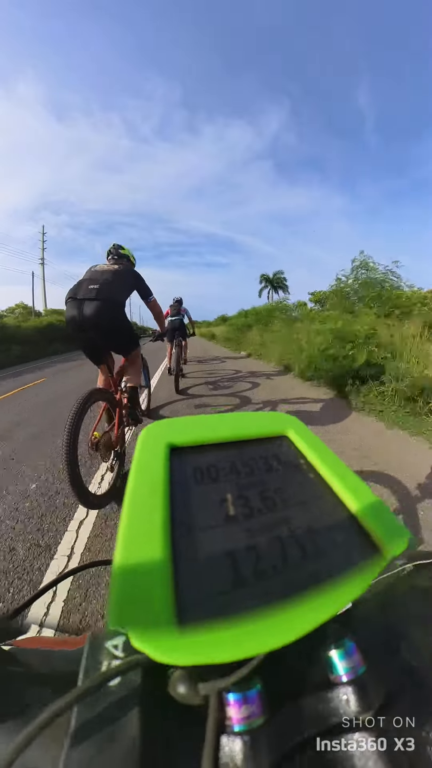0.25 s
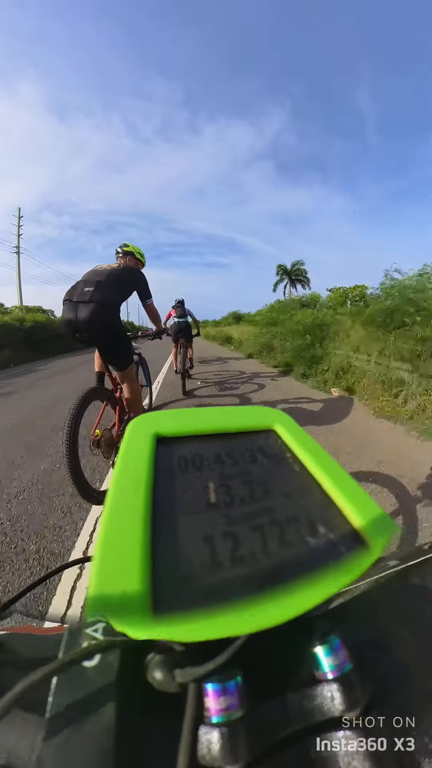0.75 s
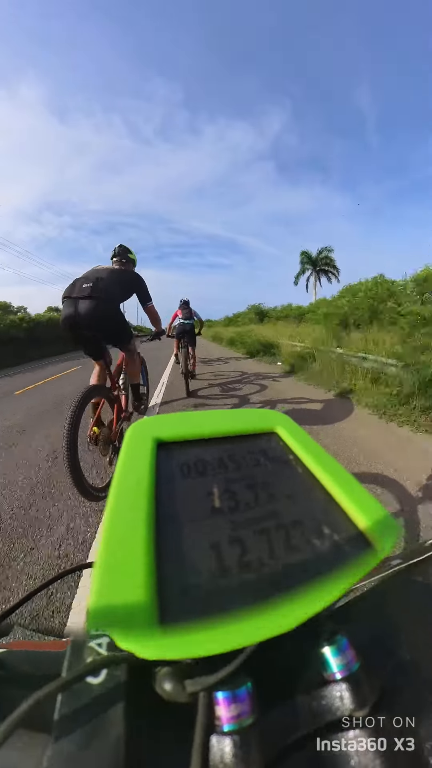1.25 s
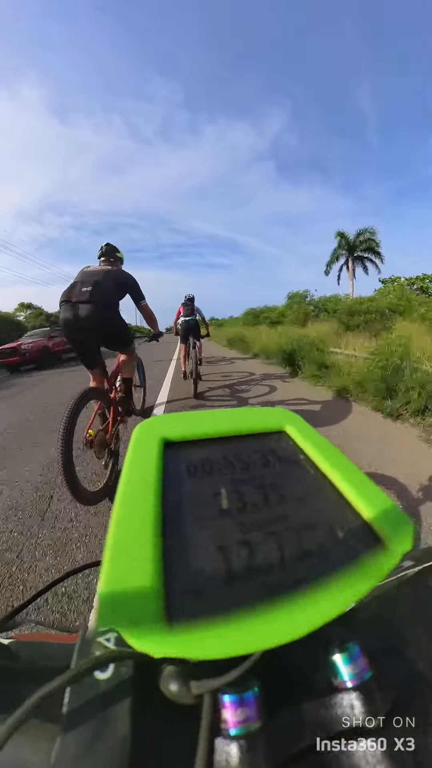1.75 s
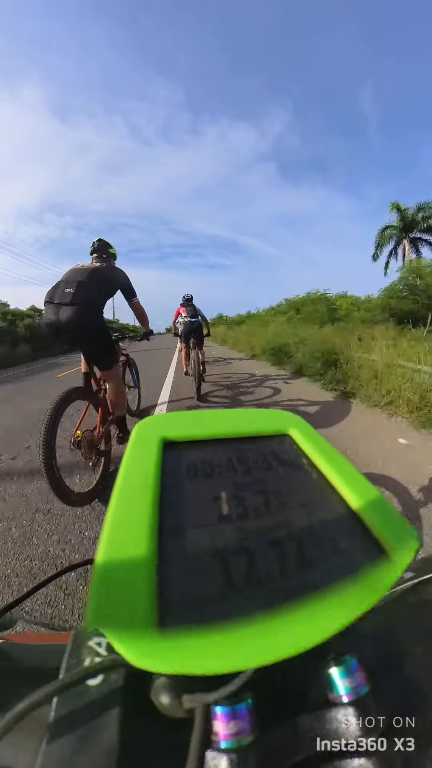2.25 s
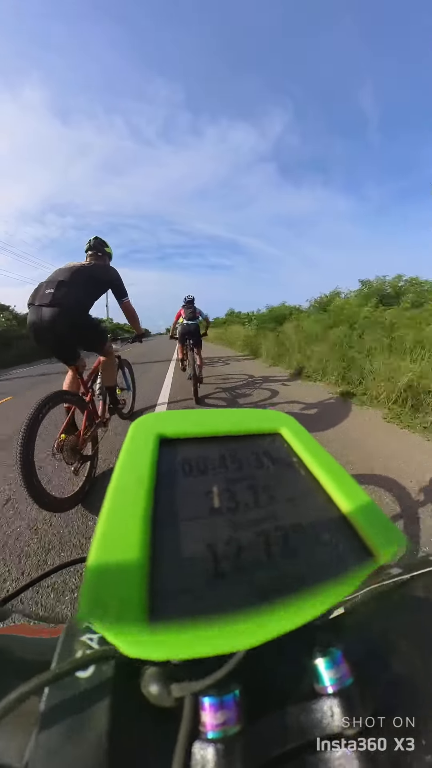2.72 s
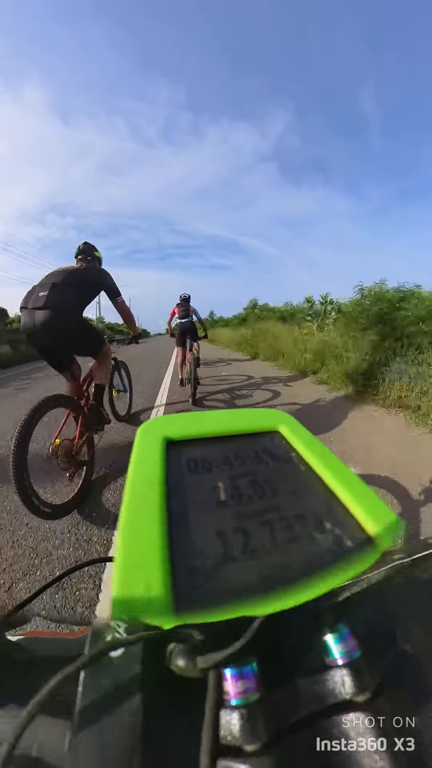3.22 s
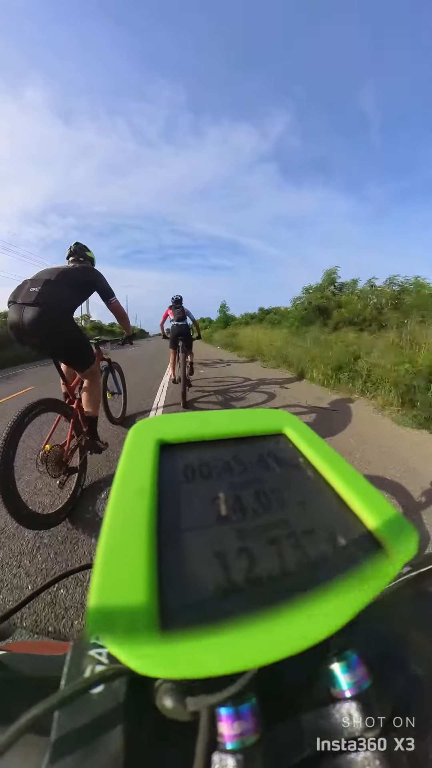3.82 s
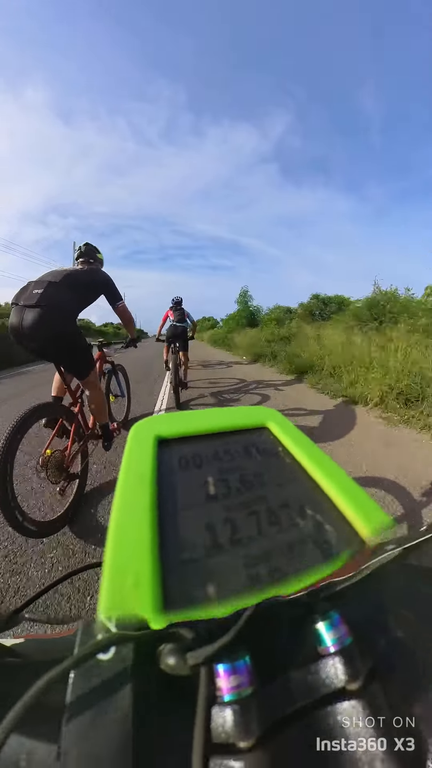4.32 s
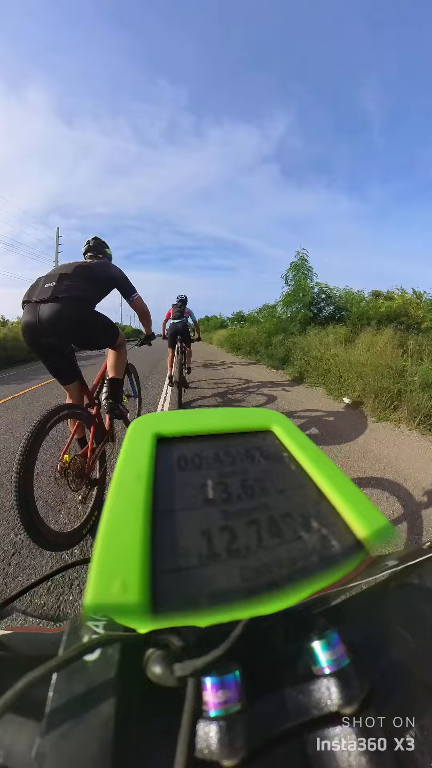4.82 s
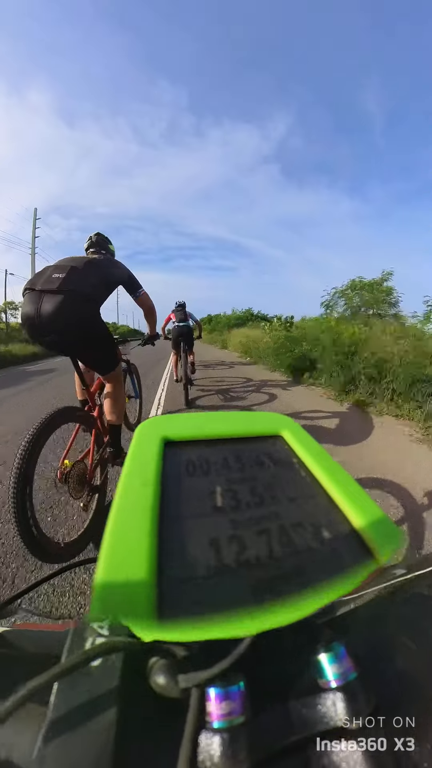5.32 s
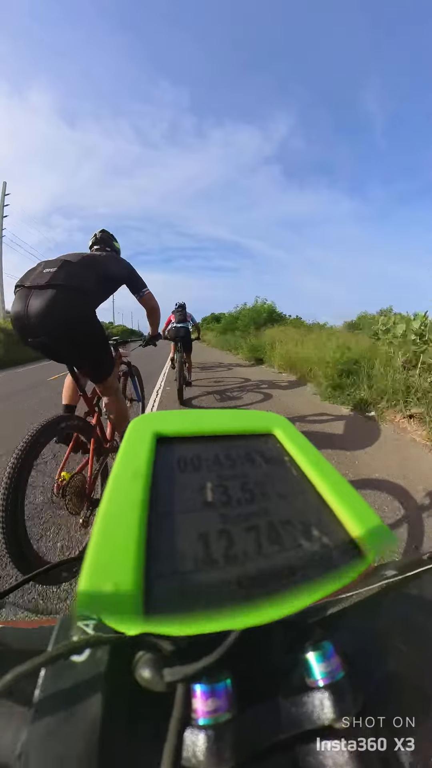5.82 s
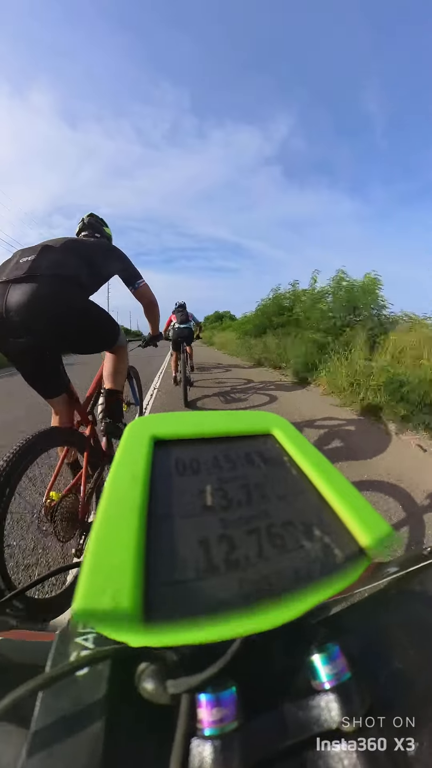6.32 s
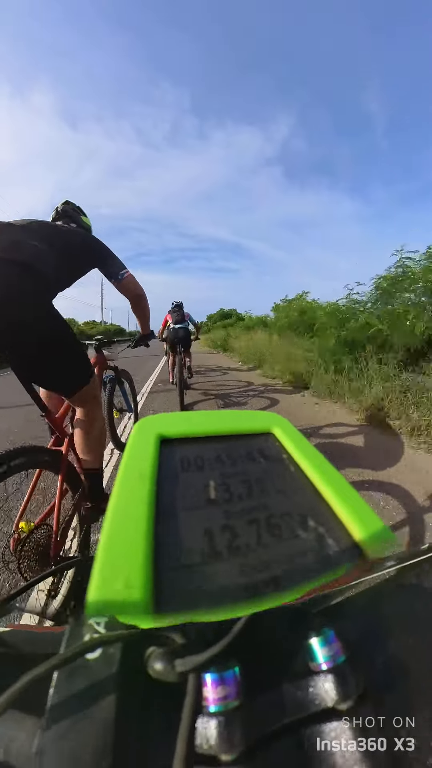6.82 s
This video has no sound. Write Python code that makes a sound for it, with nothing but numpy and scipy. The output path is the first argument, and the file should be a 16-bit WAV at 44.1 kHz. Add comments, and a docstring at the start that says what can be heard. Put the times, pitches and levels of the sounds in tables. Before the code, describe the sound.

Low, lumpy wind rumble with popping gusts, broken by dry plastic clicks and dull thumps from a loose handlebar mount on a road ride.

```python
"""Mountain bike ride with a loose camera mount

A camera on a loose handlebar mount rides along a country road. Wind noise is shaped by gusts, eddies and lulls.
Tyres drone as a wandering sine and hiss as noise; the chain is ticking noise that makes steel ring.
At knocks the mount clicks and thumps; loose fittings chatter. Both are short ringing tones set off by clicks.
Farther tyres rush as filtered noise, and a small bird whistles in gliding sines."""
import sys
import numpy as np
from scipy import signal
from scipy.fft import rfft, irfft, next_fast_len
from scipy.io import wavfile
from scipy.ndimage import uniform_filter1d, minimum_filter1d, map_coordinates

SR = 44100
rng = np.random.default_rng(int(sys.argv[2]) if len(sys.argv) > 2 else 0)


def generate_wav(signal):
    """Clip the signal to [-1, 1] and save it as 16-bit WAV at the path in sys.argv[1]."""
    frames = np.transpose(np.atleast_2d(signal))
    scaled = np.clip(frames, -1, 1) * 32767
    pcm = np.round(scaled).astype(np.int16)
    wavfile.write(sys.argv[1], SR, pcm)


N = 311301
TIME = np.arange(N) / SR

# Levels in the tables are starting points: the functions add trims and chance to many of them.
# Half widths are the spread of a bell curve. Only the shape of a colour counts, not its overall level.

# airflow over the microphone, as the level of its roar: t/s, level/dB
AIRFLOW = [(0, -38), (0.5, -33), (0.93, -41.5), (1.5, -30.5), (1.95, -35), (2.35, -28.5), (2.55, -31),
           (3.2, -31.5), (3.5, -35.5), (3.85, -33.5), (4.3, -36), (4.85, -31.5), (5.25, -33.5), (5.75, -38),
           (6.1, -35.5), (6.48, -25), (6.64, -34), (7.06, -29.5)]
# the wind drops away for a moment (a negative depth is a brief rise):
# middle t/s, depth in the buffeting/dB, depth in the roar/dB, half width/s
LULLS = [(0.241, -3.5, 11, 0.0089), (0.293, 1.5, 12, 0.024), (0.444, 5, 26, 0.016), (0.644, 16, 6, 0.0051),
         (0.718, 0, 4, .008), (0.774, 7.5, 0.5, 0.016), (0.89, 5, -3.5, 0.017), (1.01, -1.5, 1, 0.009),
         (1.21, -2.5, 9, 0.016), (1.377, 3, 10, .012), (1.49, -4.5, 7, 0.0078), (1.652, 2, 6, .007),
         (1.726, 4, 3.5, 0.024), (1.772, -2, 5, .009), (2.406, 5, 2, 0.022), (2.53, -0.5, 7, 0.016),
         (2.926, 3, 12, 0.0098), (2.97, 5, -3, 0.023), (3.386, 8, 2, 0.0075), (3.496, 5.5, 1.5, 0.037),
         (3.6, 4, 6, .012), (3.905, -3, 3, 0.0075), (3.95, 4, -2, .012), (4.175, 2.5, -1.5, 0.017),
         (4.243, 5, -2, 0.024), (4.287, -3, 3, 0.0072), (4.514, 0, 3, 0.01), (4.67, 4, 4, 0.008),
         (4.752, 6, 10, 0.012), (4.921, 5, 0, 0.0071), (5.033, 11, 6, 0.0092), (5.064, -3, 6, 0.0084),
         (5.67, -2.5, 13, 0.0055), (5.734, 8.5, -2.5, 0.024), (5.815, -5.5, 6, 0.011), (5.866, 3, -6, .011),
         (5.93, 1, -1, .01), (6.023, -2, 2, 0.034), (6.06, -1, -1, 0.0069), (6.331, 3, 5.5, 0.03),
         (6.428, 6, 1.5, .01), (6.605, 8, -5, 0.0086), (6.666, 0, 4, 0.006), (6.777, 2.5, 1, 0.012)]
# heavy eddies boom on the microphone: middle t/s, level/dB, half width/s
EDDIES = [(0.434, -19, 0.011), (0.522, -16, .01), (1.145, -16, 0.0079), (1.265, -21.5, 0.0089),
          (1.544, -16.5, 0.011), (2.258, -24, .014), (2.349, -19, 0.015), (2.499, -18, 0.0088),
          (2.814, -27, 0.0088), (2.914, -19.5, .011), (3.056, -17, 0.0099), (3.135, -26, 0.0079),
          (3.213, -14.5, 0.0062), (3.567, -20, 0.0074), (3.655, -15, 0.0061), (3.805, -25, 0.0087),
          (4.061, -26, 0.011), (4.45, -20.5, 0.017), (4.589, -24, 0.0072), (4.724, -23, 0.0061),
          (4.85, -17.5, 0.015), (5.14, -21.5, .01), (5.358, -22, 0.01), (5.443, -19.5, 0.008),
          (5.69, -19, 0.0064), (5.83, -18.5, 0.0088), (5.97, -16, .008), (6.18, -14.5, .01),
          (6.239, -15, 0.0096), (6.403, -19, .01), (6.675, -22, 0.0098), (6.986, -26, 0.011)]
# gusts hit the microphone; the broad row at 1.288 s is instead a soft swell of hiss: middle t/s, level/dB, half
# width/s, hiss of the tearing air level/dB
GUSTS = [(0.24, -28.5, 0.019, -53), (0.271, -27, 0.006, -62), (0.36, -20.5, 0.0085, -44),
         (0.466, -22.5, 0.0046, -61), (0.534, -23, 0.0084, -53), (0.74, -24.5, 0.0079, -68),
         (0.83, -29, 0.0061, -58), (1.062, -23.5, 0.009, -48), (1.122, -24, 0.021, -60),
         (1.288, -36.5, .05, -53), (1.44, -27.5, 0.015, -61), (1.52, -34, .008, -62),
         (1.626, -20.5, 0.0074, -56), (1.808, -25, 0.0083, -62), (1.862, -23, 0.0062, -62),
         (2.198, -23, 0.012, -57), (2.37, -20, 0.0032, -59), (2.465, -22, 0.0067, -51),
         (2.659, -26.5, 0.017, -51), (2.728, -21.5, 0.0035, -58), (2.875, -22.5, 0.012, -63),
         (2.978, -27, 0.0069, -60), (3.08, -25, 0.012, -48), (3.264, -23, 0.0043, -60),
         (3.282, -28, 0.0047, -47.5), (3.699, -24, 0.014, -54), (4.002, -25, 0.003, -61),
         (4.028, -23.5, 0.041, -51), (4.096, -30, 0.0075, -53), (4.388, -23, .006, -59),
         (4.411, -22, 0.01, -52), (4.551, -18, 0.012, -57), (4.71, -22, 0.013, -62),
         (4.799, -22.5, 0.014, -53), (4.896, -21.5, 0.012, -45.5), (4.99, -18.5, 0.0094, -69),
         (5.151, -19.5, 0.012, -52), (5.521, -21.5, 0.0083, -51), (5.547, -20.5, 0.021, -50),
         (5.597, -23.5, 0.016, -54), (5.642, -22, 0.0076, -62), (5.688, -18.5, 0.0046, -58),
         (5.893, -19, 0.0068, -44), (5.921, -19.5, 0.0084, -58), (6.285, -21, 0.0075, -64),
         (6.414, -37, 0.012, -48), (6.47, -25, .02, -54), (6.535, -19.5, 0.0032, -40),
         (6.579, -22, .006, -47), (6.725, -21, 0.02, -53), (6.934, -24.5, 0.006, -45.5),
         (6.971, -23.5, 0.0082, -51)]
# the front of a sharp gust slaps the microphone port: t/s, level/dB
SLAPS = [(0.242, -20), (0.347, -22), (0.555, -28), (0.737, -20), (1.061, -13), (1.110, -24), (1.625, -2),
         (1.795, -22), (2.403, -16.5), (2.465, -16), (2.726, -13), (3.577, -21), (4.001, -14), (4.380, -21),
         (4.533, -18), (4.696, -22), (4.788, -21), (4.888, -13), (4.982, -18), (5.517, -9), (5.682, -15),
         (5.892, -12.5), (6.283, -12.5), (6.534, -5), (7.034, -19)]
# air in the microphone port: f/Hz, level/dB, time to fall by 60 dB/s
PORT_MODES = [(486, 2, 0.013), (840, -2, 0.0029), (1310, -15, 0.0034)]
# colours of low buffeting, steady roar, brighter gusts and tearing air: f/Hz, level/dB per Hz
BUFFET_COLOUR = [(60, -5), (90, -8), (125, 0.5), (160, -1), (195, -2), (230, -1), (275, -8.5), (380, -17),
                 (600, -24.5), (1200, -43.5)]
ROAR_COLOUR = [(120, -2), (220, -2.5), (320, 4), (500, 0), (800, -8), (1100, -13), (1430, -22), (1530, -32),
               (2000, -31.5), (3000, -46.5), (5000, -51)]
BLAST_COLOUR = [(120, 0.5), (220, 2.5), (320, 6), (500, 1), (800, -5.5), (1080, -11.5), (1430, -18.5),
                (1550, -27), (2000, -31.5), (3000, -40.5), (5000, -52.5)]
TEAR_COLOUR = [(900, 2), (1900, 5.5), (2900, -8.5), (5000, -18)]

# tread blocks meet the road: t/s, f/Hz, drone level/dB
TREAD = [(0, 137.6, -28), (1.7, 122.6, -27.5), (2.0, 125, -21), (2.3, 133.2, -20.5), (2.42, 136.9, -31),
         (2.8, 148, -22), (3.4, 139, -31), (3.7, 134, -21), (4.1, 132.6, -25.5), (4.9, 126.3, -30.5),
         (5.4, 134, -21.5), (5.7, 135.7, -28), (6.3, 133.1, -47), (7.06, 131.1, -18)]
# roughness of the road, as handlebar shake: t/s, level/dB
SHAKE = [(0, -50), (0.35, -18), (0.95, -22), (1.35, -22), (1.8, -27), (2.1, -22.5), (2.55, -30), (2.8, -20),
         (3.05, -39), (3.3, -25), (4.7, -27), (5.08, -34), (5.35, -25), (6.2, -44), (6.55, -31),
         (7.06, -43)]
# colour of the handlebar shake: f/Hz, level/dB per Hz
SHAKE_COLOUR = [(15, -30), (28, -16), (40, 13), (53, 11), (75, -10), (110, 15), (200, -72)]

# pull on the chain, as its sizzle: t/s, level/dB
SIZZLE = [(0, -58), (0.48, -55.5), (0.66, -59.5), (1.1, -55), (2.1, -54.5), (2.8, -53), (3.6, -54.5),
          (4.45, -51.5), (5.05, -56.5), (5.33, -48), (5.6, -54.5), (6.05, -51.5), (6.25, -56), (7.06, -54)]
# the hardest chain slaps: t/s, level/dB
CHAIN_SLAPS = [(1.063, -37), (1.1932, -44), (1.3867, -37), (1.6232, -35.5), (1.731, -42), (2.0303, -43),
               (2.1161, -36), (2.3067, -40), (2.375, -42), (2.4184, -42), (2.7841, -38), (3.0001, -41),
               (3.1552, -40), (3.2201, -39.5), (3.5937, -36.5), (3.8566, -38), (3.9015, -34), (3.9426, -39),
               (4.0756, -38), (4.1904, -48), (4.3355, -36.5), (4.4722, -37), (4.5361, -40), (4.6049, -37),
               (4.6488, -35), (4.7551, -42), (4.8224, -40), (4.9312, -38), (5.0648, -42), (5.0868, -35.5),
               (5.1951, -38), (5.2839, -38), (5.3063, -43), (5.3308, -38), (5.3504, -44), (5.3966, -30.5),
               (5.5464, -39), (5.5912, -40), (5.659, -43), (5.7049, -38), (5.8152, -43), (5.8566, -39),
               (5.88, -41), (6.0122, -42), (6.1015, -34), (6.3679, -38), (6.5238, -37), (6.7012, -34),
               (6.7905, -36), (6.8139, -42), (6.925, -34)]
# colour of the chain's touch: f/Hz, level/dB per Hz
CHAIN_COLOUR = [(3000, -33), (7800, -11.5), (8500, -3.5), (8900, 0.5), (9300, -0.5), (9800, 4.5),
                (10250, 7), (10650, -6.5), (11000, 1), (11400, -1), (12600, -9), (13700, -19), (16000, -25)]
# steel rings of the drivetrain: f/Hz, level/dB, time to fall by 60 dB/s
CHAIN_MODES = [(9083, -50, .09), (9932, -47, .09), (10964, -44, .12), (11083, -48, .1)]

# the mount hits its stop: t/s, click level/dB, thump level/dB, clack level/dB
KNOCKS = [(0.083, -50, -23.5, -60), (0.140, -39.5, -35, -43), (0.24, -45, -14.5, -41),
          (0.326, -52, -23, -58), (0.4212, -36.5, -18, -38), (0.559, -24, -18.5, -37),
          (0.6978, -25, -21, -35.5), (0.827, -30, -17.5, -40), (1.134, -41, -19, -40),
          (1.389, -45, -23, -55), (1.633, -42, -19.5, -55), (1.765, -54, -16.5, -47),
          (1.817, -34, -20, -38.5), (2.5635, -42, -37, -41), (2.679, -53, -18, -48), (2.949, -50, -33, -46),
          (3.168, -48, -19, -54), (3.292, -56, -18.5, -50), (3.4141, -32.5, -13, -37),
          (3.5479, -44, -16.5, -41.5), (3.933, -50, -22, -48), (4.1307, -39, -13, -41),
          (4.21, -29, -20, -35.5), (4.421, -38, -33, -47), (4.462, -56, -40, -45), (4.584, -49, -17.5, -49),
          (4.7201, -40, -17, -46), (5.789, -55, -21, -39.5), (6.168, -52, -15.5, -57),
          (6.896, -39, -42, -49), (6.98, -60, -20.5, -52)]
# lesser bumps only set the camera swaying: t/s, thump level/dB
BUMPS = [(0.037, -24), (0.19, -18.5), (0.384, -17), (1.491, -27), (1.546, -17), (1.726, -19), (1.894, -32),
         (1.994, -29), (2.384, -27), (2.822, -25), (2.891, -17.5), (3.489, -21), (3.784, -18), (4.029, -34),
         (4.302, -25), (4.498, -24), (5.246, -20), (5.326, -18), (5.479, -22.5), (5.644, -21.5),
         (5.854, -22), (5.955, -23), (6.256, -20), (6.727, -27)]
# sharp click of the joint, its plastic body, and the camera swaying on its arm:
# f/Hz, level/dB, time to fall by 60 dB/s
CLICK_MODES = [(3600, -5, 0.0016), (5340, 2, 0.0022), (6600, 6, 0.0014), (9550, 5.5, 0.0023),
               (11050, 1.5, 0.0022)]
JOINT_MODES = [(755, 17, 0.0057), (1060, 7, 0.0072), (1380, 0, 0.022), (1970, -2, 0.008),
               (2880, -6, 0.0058)]
ARM_MODES = [(54, 1.5, 0.14), (100.6, 5, 0.07), (134, 5, 0.022)]
# loose fittings on the handlebar chatter: t/s, level/dB, middle f/Hz, average time between touches/s
RATTLES = [(0.110, -40, 6500, .002), (0.142, -35, 4300, 0.0039), (0.162, -44, 4600, .003),
           (0.4266, -39, 7000, .002), (0.887, -45, 6200, .002), (2.565, -36, 4800, .002),
           (2.14, -44, 5200, .003), (2.949, -37, 6900, 0.0022), (2.96, -38, 3800, 0.0035),
           (4.3355, -39, 7000, .0025), (4.421, -39, 6600, 0.0035), (4.4624, -40, 6400, .003),
           (4.585, -40, 5500, .002), (4.7254, -39, 7200, .002), (4.866, -47, 5200, .002),
           (6.8962, -48, 6000, 0.0039)]

# tyre hiss on the asphalt: t/s, level/dB
HISS = [(0, -55), (0.35, -56.5), (0.52, -60), (0.9, -57.5), (1.43, -53), (1.86, -58), (2.0, -51.5),
        (2.15, -51), (2.33, -57.5), (2.6, -52.5), (2.87, -60), (3.07, -52), (3.21, -64), (3.4, -57),
        (3.65, -60.5), (4.0, -55), (4.2, -61), (4.55, -59), (4.95, -62.5), (5.35, -54.5), (5.6, -66),
        (5.83, -52.5), (5.98, -65), (6.11, -51.5), (6.32, -67), (6.5, -59.5), (7.06, -58)]
# bursts of grit spraying from the tyres: middle t/s, level/dB, half width/s
GRIT = [(0.03, -58, 0.0064), (0.16, -49, 0.021), (0.225, -54, 0.012), (0.812, -50.5, 0.0097),
        (1.08, -54, 0.016), (1.645, -53, 0.0057), (1.96, -56, 0.02), (3.89, -53, 0.0099),
        (4.468, -49, 0.0098), (4.895, -61, 0.019), (5.403, -54, 0.012), (6.41, -54, 0.014),
        (6.905, -50, 0.015)]
# rush of tyres on the road ahead, an oncoming car among them: t/s, level/dB
RUSH = [(0, -46.5), (0.3, -47), (0.6, -62), (0.95, -48.5), (1.25, -46.5), (1.4, -44), (1.8, -53),
        (2.1, -44.5), (2.5, -50), (2.9, -48), (3.5, -51), (4.1, -48), (4.8, -50.5), (5.3, -43.5),
        (5.6, -48), (6.6, -47), (7.06, -51)]
# colours of the near hiss and the farther rush: f/Hz, level/dB per Hz
HISS_COLOUR = [(1500, -6), (2700, 11), (3300, 1.5), (3900, 4), (4700, 1.5), (6800, 3.5), (9000, 7),
               (12500, 1), (14000, -10), (16000, -16)]
RUSH_COLOUR = [(500, 11), (1100, 4.5), (1700, 2.5), (2300, -0.5), (2800, -12), (3400, -20), (5000, -42)]
# a small bird in the verge: start t/s, length/s, f/Hz near the top, level/dB, place of the top (0-1)
CHIRPS = [(3.596, 0.05, 5180, -60, .6), (4.666, 0.048, 5280, -61, 0.2), (4.983, .05, 5170, -62, .15)]

# low buffeting: level at mean airflow (dB), and its share of the airflow's swing
BUFFET_DB, BUFFET_FOLLOWS = -21, 0.19
JOLT_DB = 1.5  # unevenness of the handlebar shake
LOW_CUT_HZ, CUTOFF_HZ = 25, 15830
CEILING = 0.42  # limiter height, before the top is cut


def from_db(db):
    """Turn decibels into a gain."""
    return 10 ** (np.asarray(db) / 20)


def rms_one(x):
    """Scale a signal to unit power."""
    return x / np.sqrt(np.mean(x ** 2) + 1e-20)


def in_time(rows):
    """Draw each column of a table as a curve with a value at every sample."""
    t, *columns = np.transpose(rows)
    return [np.interp(TIME, t, column) for column in columns]


def noise():
    """White noise: every frequency equally strong."""
    return rng.standard_normal(N)


def colour(x, points):
    """Filter a signal with a drawn frequency curve, then scale it to unit power."""
    hz, db = np.transpose(points)
    size = next_fast_len(N)
    bins = np.maximum(np.fft.rfftfreq(size, 1 / SR), 1)
    # fall away at 12 dB per octave beyond both ends of the curve
    beyond = np.minimum(1, bins / hz[0]) * np.minimum(1, hz[-1] / bins)
    gain = from_db(np.interp(np.log(bins), np.log(hz), db)) * beyond ** 2
    return rms_one(irfft(rfft(x, size) * gain, size)[:N])


def drift(rate):
    """Smooth random curve of unit power, through `rate` random points a second."""
    knots = rng.standard_normal(8192)
    return rms_one(map_coordinates(knots, [TIME * rate], order=2, mode="mirror"))


def steady(x, span_s):
    """Even out the power of a noise over a short span."""
    size = max(int(span_s * SR), 8)
    power = uniform_filter1d(uniform_filter1d(x * x, size), size)
    return x / np.sqrt(power + 1e-9)


def bell(middle, half):
    """A smooth bump of height 1 around a moment."""
    out = np.zeros(N)
    reach = 10 * abs(half)
    near = slice(*np.searchsorted(TIME, [middle - reach, middle + reach]))
    out[near] = np.exp(-0.5 * ((TIME[near] - middle) / half) ** 2)
    return out


def swells(rows):
    """Add up bell-shaped bursts of strength."""
    return sum(from_db(db) * bell(middle, half) for middle, db, half in rows)


def strikes(times, db):
    """Place one impulse for each contact."""
    out = np.zeros(N)
    places = (np.asarray(times) * SR).astype(int)
    out[np.clip(places, 0, N - 1)] = from_db(db)
    return out


def fade(clicks, seconds):
    """Each click jumps up and dies away, reaching about a third after `seconds`."""
    return signal.lfilter([1], [1, -np.exp(-1 / (seconds * SR))], clicks + 1e-18)


def ring(clicks, hz, t60):
    """Each click starts a sine that falls by 60 dB in t60 seconds, like a small bell."""
    r = from_db(-60 / (t60 * SR))
    w = 2 * np.pi * hz / SR
    return signal.lfilter([0, np.sin(w)], [1, -2 * r * np.cos(w), r * r], clicks + 1e-18)


def struck(modes, times, db):
    """Every blow rings all modes of a body, each a little stronger or weaker by chance."""
    out = np.zeros(N)
    for k, (hz, level, t60) in enumerate(modes):
        force = db + level + rng.standard_normal(len(db))
        out += (-1) ** k * ring(strikes(times, force), hz, t60)
    return out


def lulls():
    """Decibels taken from the buffeting and from the roar where the wind drops away."""
    return sum(np.outer([low_db, roar_db], bell(middle, half)) for middle, low_db, roar_db, half in LULLS)


def wind(lumpy_db=2.5, flutter_db=1.5, surge_db=0.86, throb_db=1.63, roar_db=2.27,
         gust_db=-0.5, eddy_db=0.2, tear_db=2.5, crackle_db=5.0, fray_db=-27):
    """Airflow makes low buffeting and a lumpy roar; eddies boom, gusts are brighter and crackle."""
    flow_db, = in_time(AIRFLOW)
    lull_db, roar_lull_db = lulls()

    swing_db = BUFFET_FOLLOWS * (flow_db - flow_db.mean())
    push = from_db(BUFFET_DB + swing_db + throb_db * drift(25) - lull_db)
    boom = from_db(eddy_db) * swells(EDDIES)
    # hypot adds two strengths by their power
    buffet = steady(colour(noise(), BUFFET_COLOUR), 0.023) * np.hypot(push, boom)

    lumps = from_db(lumpy_db * drift(380))
    roar = steady(colour(noise() * lumps, ROAR_COLOUR), 0.0097) * from_db(flutter_db * drift(110))
    stream = from_db(flow_db + roar_db + surge_db * drift(26) - roar_lull_db)

    middle, db, half, hiss_db = np.transpose(GUSTS)
    blast = steady(colour(noise() * lumps, BLAST_COLOUR), 0.0092) * from_db(flutter_db * drift(110))
    gusts = swells(zip(middle, db + gust_db, half))

    crackle_gain = from_db(crackle_db * np.clip(drift(450), -2, 2))
    crackle = colour(noise() * crackle_gain, TEAR_COLOUR)
    gust_hiss = swells(zip(middle, hiss_db + tear_db, half))
    tearing = crackle * np.hypot(stream * from_db(fray_db), gust_hiss)
    return buffet + roar * stream + blast * gusts + tearing


def slaps(slap_db=-0.5):
    """A sudden step in pressure makes the air in the microphone port pop for a few cycles."""
    t, db = np.transpose(SLAPS)
    return struck(PORT_MODES, t, db + slap_db)


def tyres(wander=0.0498, drone_trim_db=-3.0, shake_trim_db=-8.5, dip_share=0.7):
    """Treads drone through the frame and rough road jolts the bar; both dip along with the buffeting."""
    hz, drone_db = in_time(TREAD)
    pitch = hz * (1 + wander * drift(35))
    wave = np.sqrt(2) * np.sin(2 * np.pi * np.cumsum(pitch) / SR)
    drone = wave * from_db(drone_db + drone_trim_db)

    shake_db, = in_time(SHAKE)
    rumble = steady(colour(noise(), SHAKE_COLOUR), 0.03)
    shake = rumble * from_db(shake_db + shake_trim_db + JOLT_DB * drift(23))
    return (drone + shake) * from_db(-dip_share * lulls()[0])


def mount(click_db=3.0, clack_db=4.0, thump_db=5.5, contact_s=0.001205,
          bounce_s=0.0024, bounce_db=-16, sway_s=0.00299):
    """The joint clicks shut and bounces once, then the camera sways on its arm."""
    t, click, thump, clack = np.transpose(KNOCKS)
    t = t + contact_s
    snap = struck(CLICK_MODES, t, click + click_db)
    bounce = struck(CLICK_MODES, t + bounce_s, click + bounce_db)
    body = struck(JOINT_MODES, t, clack + clack_db)
    sway = struck(ARM_MODES, t + sway_s, thump + thump_db)
    return snap + bounce + body + sway


def bumps(thump_db=1.5):
    """Small bumps rock the camera on its arm without closing the joint."""
    t, db = np.transpose(BUMPS)
    return struck(ARM_MODES, t, db + thump_db)


def chain(links_per_s=85, spread_db=-0.5, decay_s=0.014, slap_decay_s=0.013, slap_db=-8.0,
          sizzle_db=-2.5, swell_db=0.5, rub=0.62, shift_db=2.0):
    """Links tick over the sprockets in short bursts; steel rings that trade strength as the chain moves."""
    link_gain = from_db(spread_db * np.clip(rng.standard_normal(N), -2, 2))
    links = (rng.random(N) < links_per_s / SR) * link_gain
    # a constant rub lies under the ticking
    ticking = rms_one(rub + rms_one(fade(links, decay_s)))
    running = ticking * from_db(in_time(SIZZLE)[0] + sizzle_db + swell_db * drift(30))

    t, db = np.transpose(CHAIN_SLAPS)
    force = np.hypot(running, fade(strikes(t, db + slap_db), slap_decay_s))
    touch = force * colour(noise(), CHAIN_COLOUR)
    out = touch.copy()
    for hz, level, t60 in CHAIN_MODES:
        gain = from_db(level - 2.5 + shift_db * np.clip(drift(7.2), -2, 2))
        out += gain * ring(touch, hz, t60)
    return out


def rattles(touches_db=0.0, loss_db=5.0, ring_s=0.0029, upper_ratio=1.3, lower_ratio=0.72, count=3):
    """A fitting touches a few times, on the whole ever more weakly, and rings around its own pitch."""
    out, touch = np.zeros(N), np.arange(count)
    for t, db, hz, gap in RATTLES:
        times = t + gap * touch * rng.uniform(0.8, 1.2, count)
        for ratio in (lower_ratio, 1, upper_ratio):
            force = db + touches_db - loss_db * touch + 2 * rng.standard_normal(count)
            share = 1 if ratio == 1 else -0.5
            out += share * ring(strikes(times, force), hz * ratio, ring_s)
    return out


def road(hiss_trim_db=-3.0, grain_db=0.5, patchy_db=1.5, mottle_db=3.5, rush_waver_db=1.0, rush_trim_db=-1.5):
    """Asphalt hisses under near tyres, gritty and mottled from band to band; farther tyres rush."""
    edges = np.geomspace(1400, 16000, 13)  # twelve bands, in Hz
    white = rng.standard_normal((2, N))  # neighbouring bands take different noise
    mottled = np.zeros(N)
    for k, band in enumerate(zip(edges, edges[1:])):
        sos = signal.butter(2, band, "band", fs=SR, output="sos")
        mottled += signal.sosfilt(sos, white[k % 2]) * from_db(mottle_db * drift(60))
    hiss = colour(mottled * from_db(grain_db * drift(600)), HISS_COLOUR)
    hiss_level = from_db(in_time(HISS)[0] + hiss_trim_db + patchy_db * drift(35))
    near = hiss * np.hypot(hiss_level, swells(GRIT))

    rush_level = from_db(in_time(RUSH)[0] + rush_trim_db + rush_waver_db * drift(20))
    return near + colour(noise(), RUSH_COLOUR) * rush_level


def bird(droop=0.07, warble=0.004, flutter_db=1.5):
    """Each chirp is a thin, unsteady whistle that arches over and falls."""
    out = np.zeros(N)
    for t, length, hz, db, crest in CHIRPS:
        along = np.clip((TIME - t) / length, 0, 1)  # 0 at the start, 1 at the end
        pitch = hz * (1 - droop * (along - crest) ** 2 + warble * drift(230))
        whistle = np.sin(2 * np.pi * np.cumsum(pitch) / SR)
        out += from_db(db) * np.sin(np.pi * along) * whistle
    return out * from_db(flutter_db * drift(160))


def scene():
    """All sources meet at one microphone in the open air."""
    riding = wind() + slaps() + tyres()
    bike = mount() + bumps() + chain() + rattles()
    background = road() + bird()
    return (riding + bike + background)[None]


def record(dry):
    """The deepest rumble is filtered out, a fast limiter holds the peaks down, and the top is cut."""
    low_cut = signal.butter(2, LOW_CUT_HZ, "high", fs=SR, output="sos")
    dry = signal.sosfilt(low_cut, dry)
    size = 96  # samples: how quickly the limiter moves
    needed = np.minimum(1, CEILING / (np.abs(dry) + 1e-9))
    held = minimum_filter1d(needed, 2 * size)
    gain = uniform_filter1d(uniform_filter1d(held, size), size)
    top_cut = signal.ellip(10, 0.2, 80, CUTOFF_HZ, fs=SR, output="sos")
    return signal.sosfilt(top_cut, dry * gain)


dry = scene()
out = record(dry)
generate_wav(out)
```